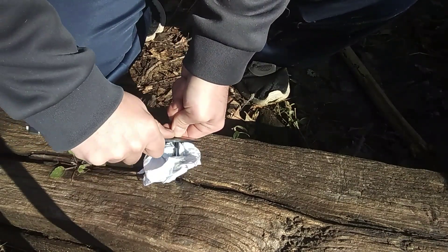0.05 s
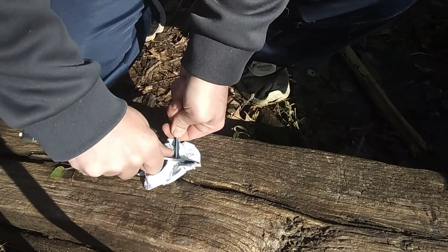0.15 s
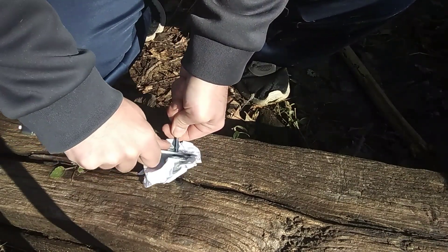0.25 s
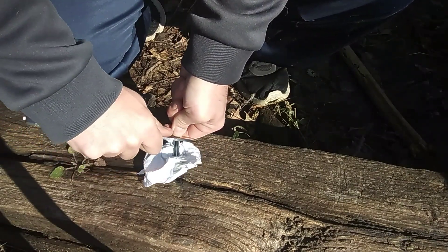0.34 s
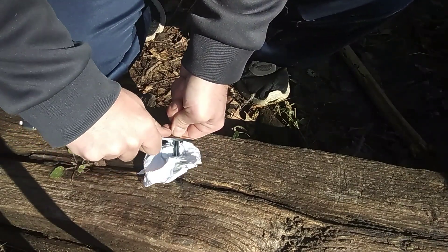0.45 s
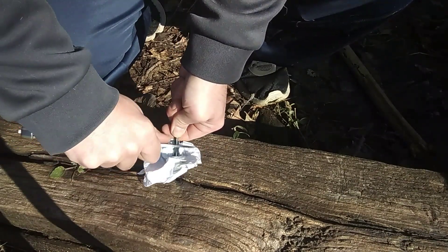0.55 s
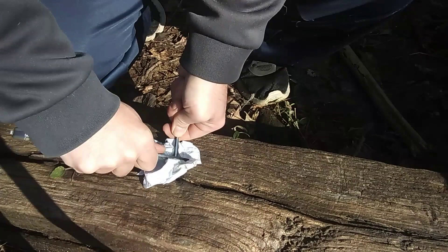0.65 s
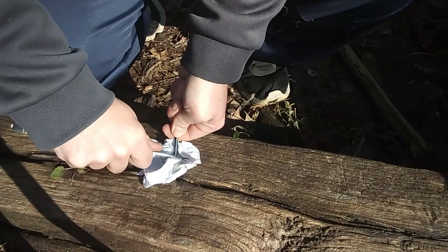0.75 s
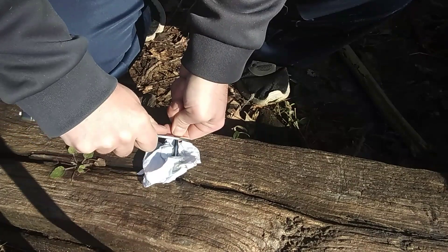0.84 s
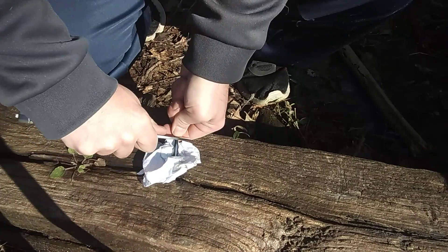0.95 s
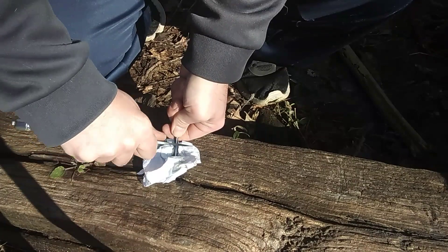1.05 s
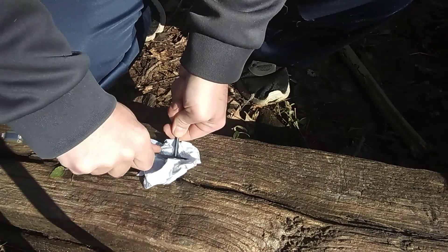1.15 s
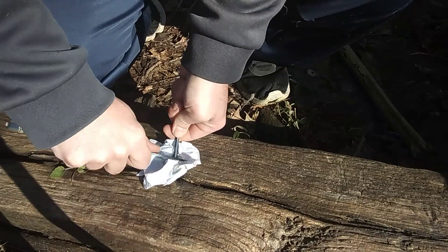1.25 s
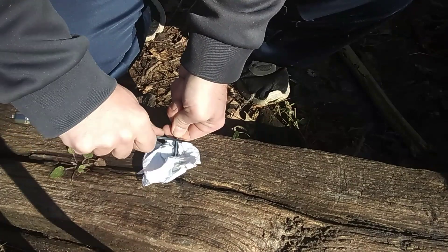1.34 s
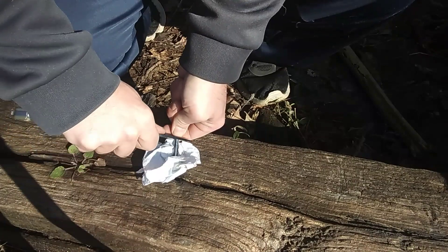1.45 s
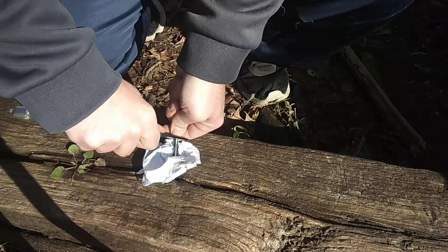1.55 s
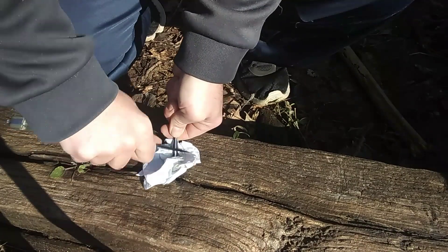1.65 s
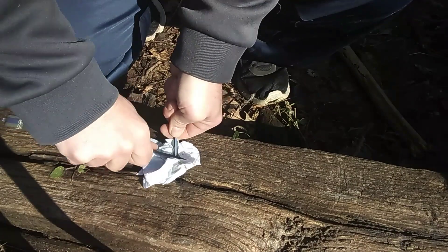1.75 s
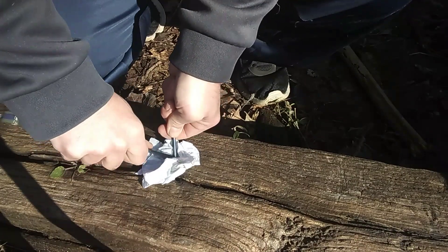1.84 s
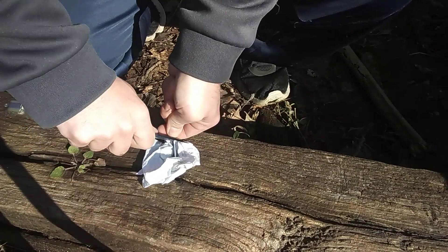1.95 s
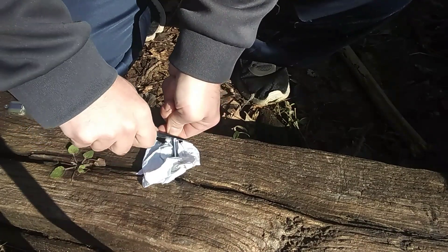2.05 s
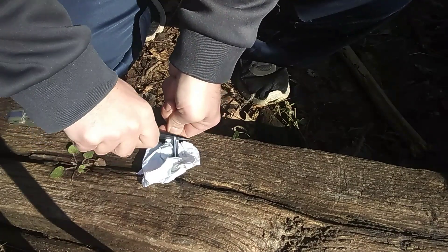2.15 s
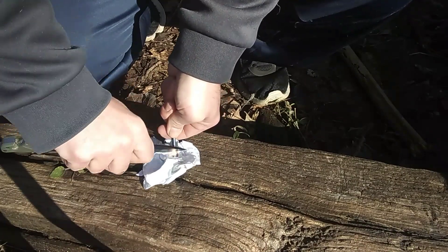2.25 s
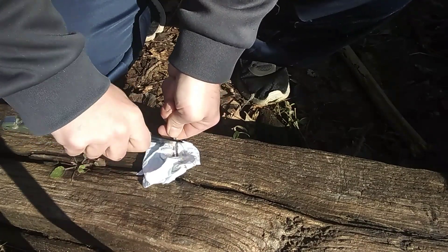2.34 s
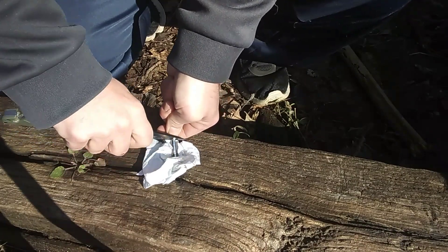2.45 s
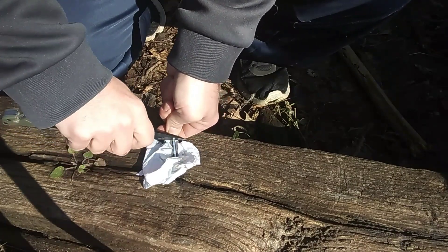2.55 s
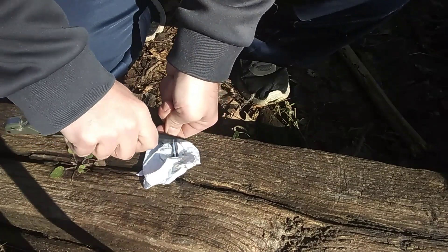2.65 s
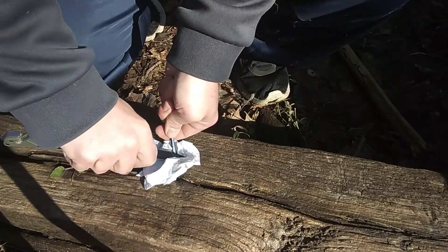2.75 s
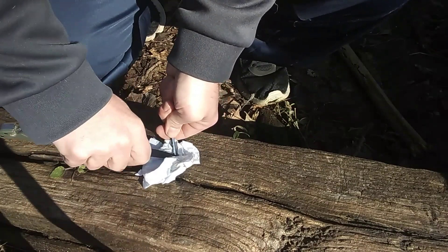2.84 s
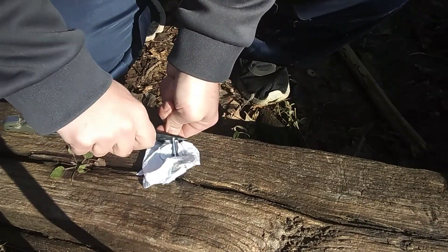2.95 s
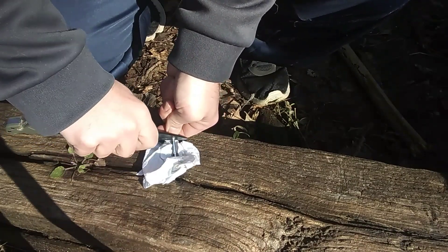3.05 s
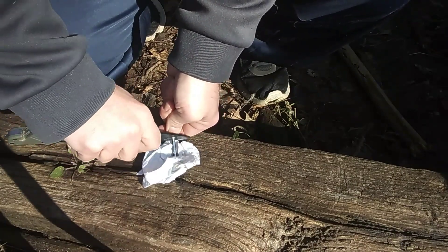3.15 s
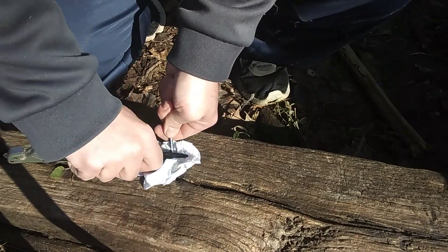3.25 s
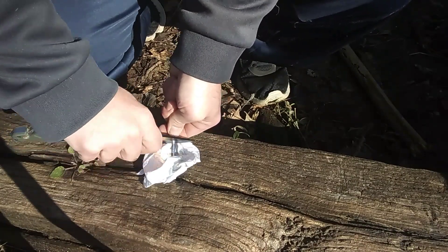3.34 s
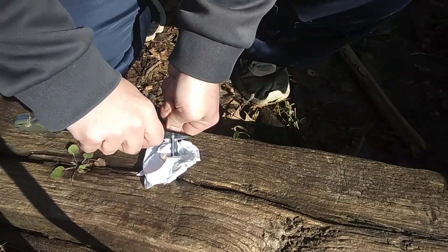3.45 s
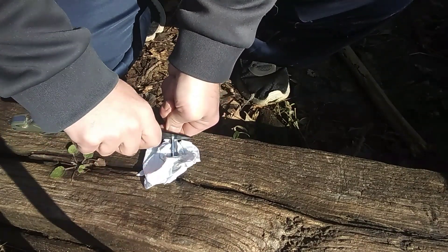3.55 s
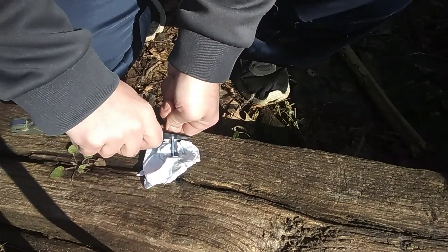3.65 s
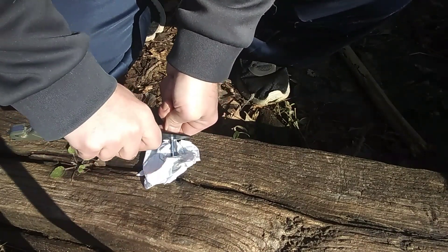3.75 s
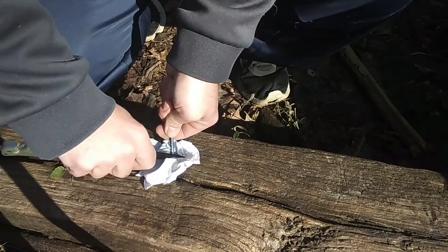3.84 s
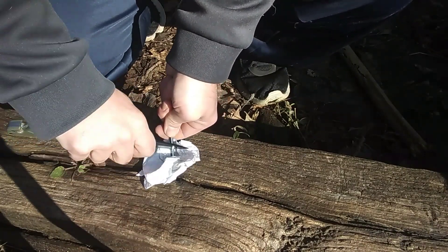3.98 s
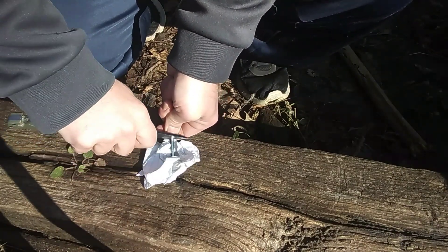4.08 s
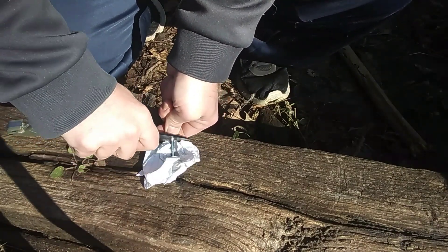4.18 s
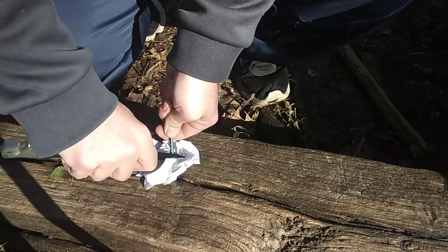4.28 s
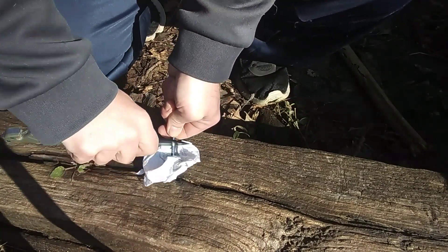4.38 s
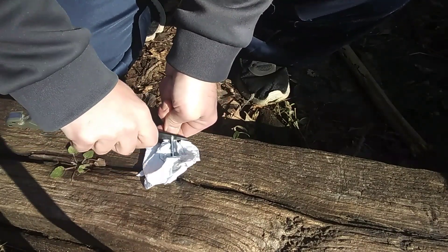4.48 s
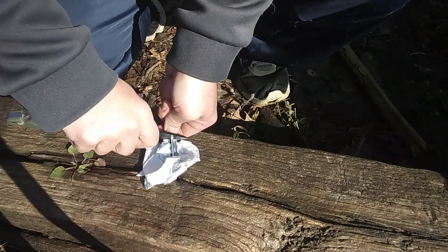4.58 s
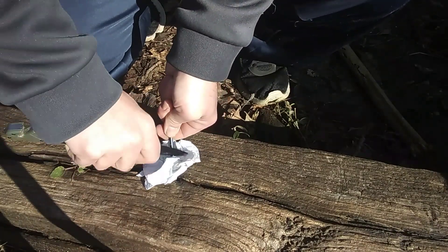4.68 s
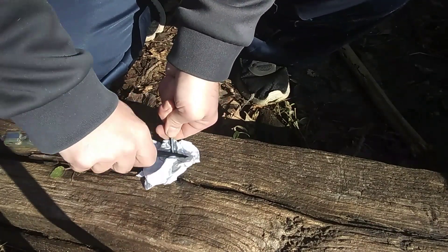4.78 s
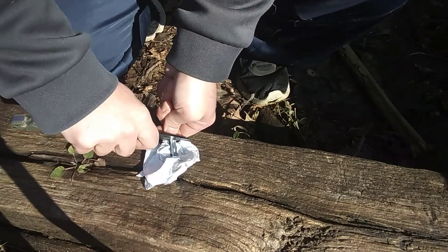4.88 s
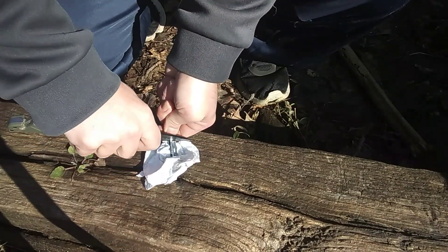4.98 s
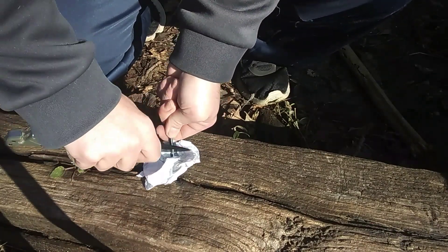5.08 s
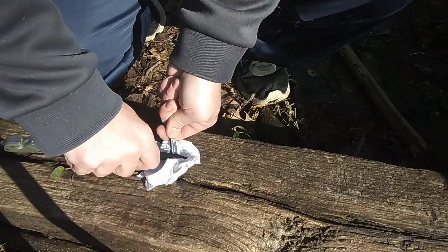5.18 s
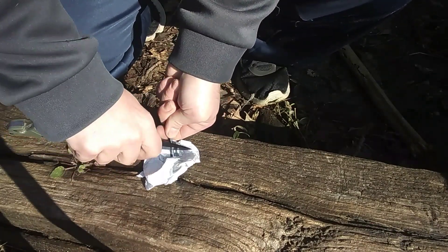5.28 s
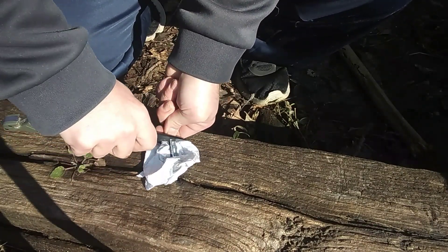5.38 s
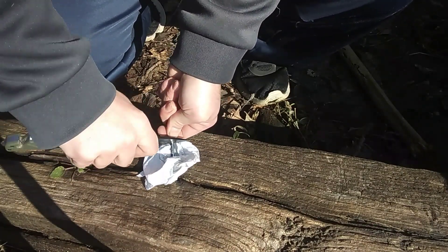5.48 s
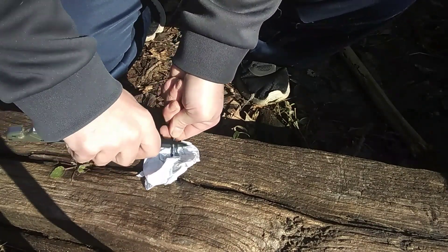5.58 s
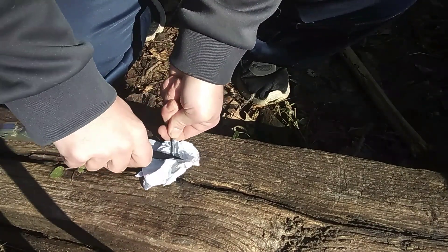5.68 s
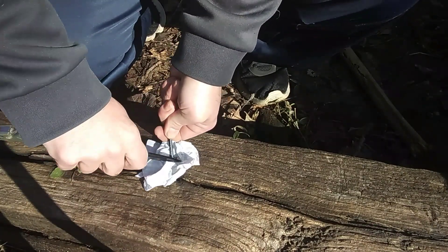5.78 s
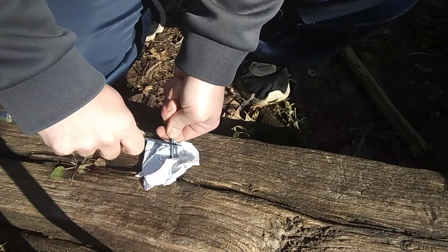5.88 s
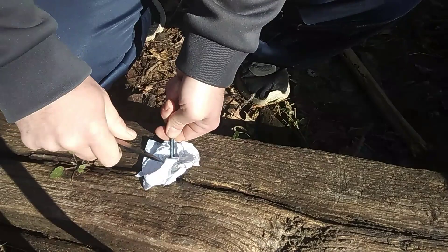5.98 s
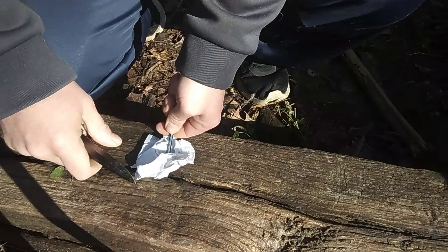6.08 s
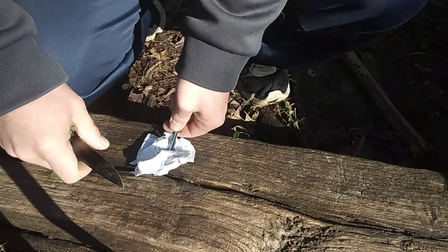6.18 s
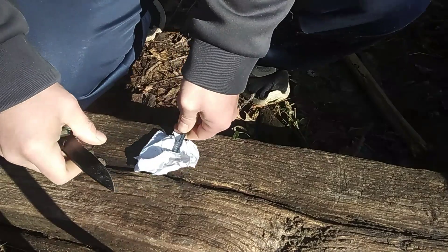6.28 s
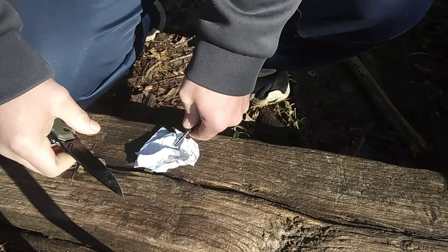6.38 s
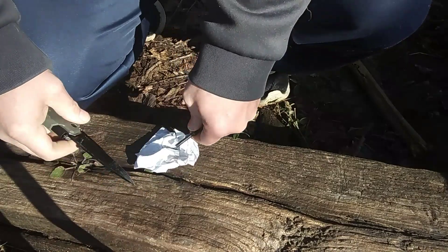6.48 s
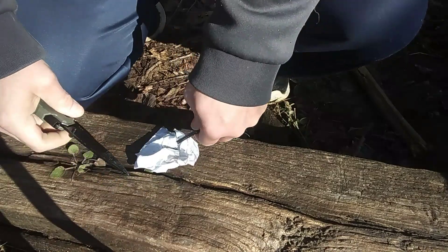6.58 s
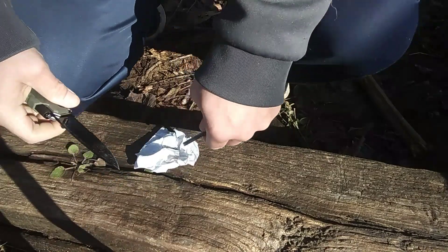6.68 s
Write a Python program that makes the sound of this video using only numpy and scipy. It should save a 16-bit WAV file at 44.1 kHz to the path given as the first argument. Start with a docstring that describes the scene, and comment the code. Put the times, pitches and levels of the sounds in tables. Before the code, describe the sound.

A knife blade scrapes down a small fire-starter rod in twelve quick rasping strokes ending in sharp snaps, with light metallic ticks between, outdoors.

```python
"""Outdoors, by a log: a knife is scraped twelve times down a fire-starter rod held against the wood.
Each stroke is a rising rasp of chip noise, shaped by edge force, that catches once and ends in a snap:
noise bursts ringing resonances of steel, hand and log. The blade then ticks and drags its way back up.
Sleeves rustle, the ground returns a short scattered tail, and filtered noise makes a soft distant rush."""
import sys
import numpy as np
from scipy import signal
from scipy.fft import rfft, irfft, next_fast_len
from scipy.io import wavfile
from scipy.ndimage import uniform_filter1d, map_coordinates

SR = 44100
rng = np.random.default_rng(int(sys.argv[2]) if len(sys.argv) > 2 else 0)


def wav_out(sig):
    """Save sig, one row per channel (or a flat mono array), as 16-bit PCM at SR to the path in sys.argv[1]."""
    wavfile.write(sys.argv[1], SR, np.round(np.clip(np.atleast_2d(sig).T, -1, 1) * 32767).astype(np.int16))


N = 296352

# All table levels are relative: each layer adds its own trim.
# Forward strokes, one in two bites: [edge slips off t/s, length/s, rasp level/dB, crack level/dB,
# rod-and-hand knock level/dB, log thud level/dB]
STROKE_ROWS = [(0.146, 0.018, -30, -21.5, -38.5, -40), (0.623, 0.017, -25, -15, -20, -34.5),
               (1.129, 0.015, -23, -12, -21, -34), (1.7145, 0.018, -28.5, -10.5, -26, -27.5),
               (2.271, 0.014, -32, -31, -34, -44), (2.748, 0.02, -31, -16, -22, -30),
               (3.278, 0.021, -26.5, -16.5, -24, -31.5), (3.844, 0.021, -27, -14, -18.5, -26.5),
               (4.324, 0.019, -29, -10.5, -19, -29), (4.7423, 0.027, -32.5, -10, -27, -27.5),
               (5.125, 0.022, -39, -23.5, -25, -46), (5.161, 0.016, -31, -24, -23.5, -28.5),
               (5.6511, 0.015, -28.5, -14, -29, -40)]
# Blade sliding lightly back up the rod: [middle t/s, length/s, level/dB]
DRAG_ROWS = [(0.226, 0.024, -38), (0.341, 0.042, -43), (0.713, 0.05, -52), (0.835, 0.04, -40),
             (1.201, 0.018, -41.5), (1.348, 0.072, -39.5), (1.791, 0.037, -45.5), (1.849, 0.033, -47),
             (1.959, 0.04, -43), (2.305, 0.022, -45), (2.37, 0.075, -42), (2.482, 0.05, -53),
             (2.837, 0.045, -49.5), (2.945, 0.053, -38.5), (3.368, 0.044, -37.5), (3.372, 0.14, -42),
             (3.944, 0.046, -41.5), (4.06, 0.04, -38.5), (4.42, 0.056, -39.5), (4.528, 0.016, -41.5),
             (4.847, 0.05, -39), (5.34, 0.065, -40.5), (5.449, 0.048, -52.5), (5.791, 0.13, -52.5)]
# Resonances: [f/Hz, width/Hz, level/dB]
STEEL_MODES = [(1910, 395, -0.5), (2720, 384, 1.5), (3130, 610, -0.5), (4090, 595, 3), (4950, 1090, 1),
               (7500, 1860, -5), (10900, 1100, -11.5), (12700, 3900, -21.5)]  # ring of blade and rod
KNOCK_MODES = [(763, 830, 0.5), (1075, 155, 9), (1336, 150, 0)]  # rod and hand
THUD_MODES = [(304, 67, 1), (554, 120, 3)]  # log under the rod
ZING_MODES = [(5740, 840, 11), (8330, 1200, -1.5), (10000, 1530, -1)]  # edge skimming the rod


def amp(db):
    """Decibels to gain."""
    return 10 ** (np.asarray(db) / 20)


def unit(x):
    """Scale to rms 1."""
    return x / np.sqrt(np.mean(x ** 2) + 1e-20)


def along(points, hz):
    """Read (f/Hz, value) points on a log frequency axis."""
    f, v = np.transpose(points)
    return np.interp(np.log(hz + 1), np.log(f + 1), v)


def wobble(rate_hz):
    """Smooth random curve, rate_hz knots a second."""
    knots = rng.standard_normal(int(N * rate_hz / SR) + 4)
    return map_coordinates(knots, [np.arange(N) * rate_hz / SR])


def filtered(x, response):
    """Multiply the spectrum of x by a function of frequency."""
    m = 2 * next_fast_len(N // 2 + SR // 4)
    return irfft(rfft(x, m) * response(np.fft.rfftfreq(m, 1 / SR)), m)[..., :N]


def coloured(x, spectrum):
    """Minimum-phase filter with the given spectrum; white noise keeps its power."""
    def response(hz):
        cepstrum = irfft(np.log(unit(amp(along(spectrum, hz)))))
        half = len(cepstrum) // 2
        cepstrum[1:half] *= 2  # fold onto positive time: causal
        cepstrum[half + 1:] = 0
        return np.exp(rfft(cepstrum))
    return filtered(x, response)


def resonate(x, modes):
    """Damped resonances, steep below the first one; white noise keeps its power."""
    def response(f):
        h = 0
        for k, (centre, width, db) in enumerate(modes):
            damping = 1j * f * width
            h = h + (-1) ** k * amp(db) * damping / (centre * centre - f * f + damping)
        low = modes[0][0] * 0.77
        h = h * f * f / (low * low - f * f + 1j * f * low)
        return h / np.sqrt(np.mean(abs(h) ** 2))
    return filtered(x, response)


def add(track, s, sound):
    """Mix a sound into the track at s seconds."""
    part = track[..., max(round(s * SR), 0):][..., :sound.shape[-1]]
    part += sound[..., :part.shape[-1]]


def grit(rate_hz, spread_db, smooth_db):
    """Tiny chips torn off at random moments and sizes, over smooth friction (mid, side)."""
    sizes = amp(spread_db * np.clip(rng.standard_normal(N), -2, 2))
    chips = (rng.random(N) < rate_hz / SR) * sizes
    chips = unit(chips * rng.choice([-1, 1], (2, N)))
    return unit(chips + amp(smooth_db) * rng.standard_normal((2, N)))


def burst(rise_s, t60_s, first):
    """One hard impact (weight first) 1 ms in, amid micro-impacts that swell and die (mid, side)."""
    t = np.arange(SR // 20) / SR
    x = rng.standard_normal((2, len(t))) * (1 - np.exp(-(t / rise_s) ** 2)) * amp(-60 * t / t60_s)
    x /= np.linalg.norm(x, axis=1, keepdims=True)
    x[:, round(.001 * SR)] += first * np.array([1, rng.choice([-1, 1])])
    x /= np.linalg.norm(x, axis=1, keepdims=True)
    return x * np.sqrt(SR / 1000)  # energy of 1 ms at rms 1


def swells(rows, steep):
    """Gain of rounded swells given as [middle t/s, length/s, level/dB]."""
    t = np.arange(N) / SR
    return sum(amp(db) / (1 + (2 * abs(t - s) / length) ** steep) for s, length, db in rows)


def strokes():
    """The edge first skims with a bright zing, then bites harder until it leaves the rod; the log rumbles along."""
    # [f/Hz, density/dB per Hz]
    rasp_spectrum = [(88, -40), (150, -30), (303, -20), (514, -11), (730, -29.5), (979, 10.5), (1390, -1.5),
                     (1940, 3.5), (2450, -0.5), (3220, 5), (3550, 1), (5680, 3.5), (9440, -6),
                     (10400, -5.5), (16000, -55)]
    build_db, light_db = 2.5, 6.5  # rise per stroke length; drop before the edge digs in
    skim_reach, let_go_s = 1.68, 0.0013  # reach in stroke lengths; release time constant
    skim_db, knock_rub_db, thud_rub_db = -7.5, -15, -19  # zing re rasp; knock and thud re their snap
    t = np.arange(N) / SR
    skim, bite, knock, thud = np.zeros((4, N))
    for end, length, db, _, knock_db, thud_db in STROKE_ROWS:
        to_go = abs(t - end) / length
        touching = np.exp(-np.maximum(t - end, 0) / let_go_s) / (1 + (to_go / skim_reach) ** 6)
        digs_in = 1 / (1 + to_go ** 12)
        force = touching * amp(-build_db * to_go - light_db * (1 - digs_in))
        skim += touching * amp(db + skim_db) / (1 + to_go ** 4)
        bite += force * amp(db)
        knock += force * amp(knock_db + knock_rub_db)
        thud += force * amp(thud_db + thud_rub_db)
    chatter = amp(2.5 * wobble(380))  # stick and slip
    rasp = coloured(grit(rate_hz=3000, spread_db=1.0, smooth_db=-2.5) * bite * chatter, rasp_spectrum)
    zing = resonate(grit(rate_hz=3000, spread_db=4, smooth_db=-3) * skim * chatter, ZING_MODES)
    drive = grit(rate_hz=2500, spread_db=3, smooth_db=-3) * chatter
    rumble = resonate(drive * knock, KNOCK_MODES) + resonate(drive * thud, THUD_MODES)
    return amp(-2.0) * rasp + zing + rumble


def snaps():
    """A last chip tears off: bursts ring the steel (crack), its slower low modes, rod and hand, and the log."""
    crack, flex, knock, thud = np.zeros((4, 2, N))
    for s, _, _, db, knock_db, thud_db in STROKE_ROWS:
        add(crack, s - .0005, amp(db - 5.0) * burst(rise_s=0.0021, t60_s=0.0097, first=1.0))
        add(flex, s + 0.000824, amp(db - 16.5) * burst(rise_s=0.00019, t60_s=0.063, first=1.0))
        add(knock, s + 0.00028, amp(knock_db - 2.5) * burst(rise_s=0.0045, t60_s=0.0031, first=0.9))
        add(thud, s + 0.00177, amp(thud_db - 1.5) * burst(rise_s=0.00069, t60_s=0.021, first=0.76))
    steel = resonate(crack, STEEL_MODES) + resonate(flex, STEEL_MODES[:3])
    return steel + resonate(knock, KNOCK_MODES) + resonate(thud, THUD_MODES)


def ticks():
    """Sharp ringing taps, a few ms of faint noise swelling in before each; the touch point sets the pitch."""
    # clearest taps of blade on rod: [t/s, level/dB, f/Hz]
    taps = [(0.1575, -24, 6050), (0.3281, -19.5, 1930), (0.3471, -17.5, 1720), (0.4136, -20.5, 4270),
            (0.6836, -11, 4070), (0.7447, -16.5, 2050), (0.811, -18.5, 4860), (0.9197, -19.5, 4260),
            (1.1902, -13, 3250), (1.2112, -14.5, 3860), (1.293, -13.5, 6240), (1.3401, -12, 2100),
            (1.3453, -7.5, 2300), (1.389, -19, 4530), (1.7451, -6.5, 6100), (1.9, -25, 3340),
            (1.9776, -21.5, 2930), (2.0489, -34, 3700), (2.981, -15.5, 5060), (3.2909, -9.5, 6100),
            (3.468, -20, 4630), (3.5413, -25, 3630), (3.9036, -22, 3080), (3.9472, -18.5, 4830),
            (4.0715, -15.5, 4700), (4.3966, -21, 1100), (4.4095, -18.5, 5270), (4.5236, -20.5, 4300),
            (4.8331, -20.5, 1950), (4.8638, -23, 5240), (5.3261, -23.5, 4560), (5.371, -18, 5160),
            (5.6278, -26, 5000), (5.9307, -30.5, 6900), (6.0705, -29.5, 6440)]
    ring_db, ring_octaves, tap_knock_db = 8, 0.36, -24  # lift and width of brightest band; knock re tap
    steel, knock = np.zeros((2, 2, N))
    for s, db, centre_hz in list(taps) + catches(count=3):
        z = rfft(burst(rise_s=0.00065, t60_s=0.021, first=1.0))
        octaves = np.log2((np.linspace(0, SR / 2, z.shape[1]) + 1) / centre_hz)
        emphasis_db = ring_db * np.exp(-(octaves / ring_octaves) ** 2)
        tap = np.roll(irfft(z * amp(emphasis_db)), SR // 1000)
        add(steel, s - .001, amp(db - 13.0) * tap)
        lead_in = burst(rise_s=0.0007, t60_s=0.035, first=0)[:, ::-1]  # reversed: noise swells up to the tick
        add(steel, s + .001 - lead_in.shape[1] / SR, amp(db - 28) * lead_in)
        add(knock, s, amp(db + tap_knock_db) * burst(rise_s=0.00058, t60_s=0.0055, first=1.0))
    return resonate(steel, STEEL_MODES) + resonate(knock, KNOCK_MODES)


def catches(count):
    """Rows [t/s, level/dB, f/Hz]: a catch late in every stroke, count snags per drag, strongest mid-drag."""
    lead_s, catch_db, catch_hz = 0.01, 12, 4200  # time before slip-off; level re rasp
    snag_db, spread_db, snag_hz, spread_octaves = 15.5, 3.5, 4030, 0.8  # level re drag
    rows = [(end - lead_s, db + catch_db, catch_hz) for end, _, db, *_ in STROKE_ROWS]
    for s, length, db in DRAG_ROWS:
        for when, size, pitch in rng.uniform(-1, 1, (count, 3)):
            level_db = db + snag_db + spread_db * (size - when ** 2)
            rows.append((s + when * length / 2, level_db, snag_hz * 2 ** (spread_octaves * pitch)))
    return rows


def drags():
    """Under light pressure the edge grates over the scored rod: chip noise plus a fluctuating zing."""
    # [f/Hz, density/dB per Hz]
    slide_spectrum = [(120, -49.5), (200, -11), (968, 9.5), (1320, 5.5), (1480, 8), (2020, 4.5), (2470, 3),
                      (4680, 6), (7970, -2), (9230, -5.5), (10900, -21), (13100, -28), (16000, -47)]
    force = swells(DRAG_ROWS, steep=4.3) * amp(3 * wobble(200))
    slide = coloured(grit(rate_hz=2000, spread_db=10.5, smooth_db=0) * force, slide_spectrum)
    scratches = grit(rate_hz=1200, spread_db=5, smooth_db=-4) * amp(3.5 * wobble(90))
    zing = resonate(scratches * force, ZING_MODES)
    return amp(-3.0) * slide + amp(-10) * zing


def shifting(x, depth_db):
    """The contact point moves along blade and rod, so the favoured frequencies keep changing within ms."""
    z = signal.stft(x, nperseg=256)[2]
    field = uniform_filter1d(rng.standard_normal(z.shape[1:]), size=5, axis=0)  # over frequency
    field = unit(uniform_filter1d(field, size=6, axis=1))  # over time
    gain = unit(amp(depth_db * np.clip(field, -2, 2)))
    return signal.istft(z * gain, nperseg=256)[1][:, :N]


def sleeves():
    """Cloth that never quite rests: creases rustle faintly, most when the hands draw back at the end."""
    # sleeves brush as the hands move: [middle t/s, length/s, level/dB]
    brushes = [(4.63, 0.3, -73), (5.8, 0.16, -52.5), (6.11, 0.09, -52.5), (6.4, 0.072, -57)]
    motion = amp(-67) + swells(brushes, steep=2.3)
    creases = grit(rate_hz=220, spread_db=4.5, smooth_db=-1) * motion * amp(-5 + 3 * wobble(40))
    # f/Hz, density/dB per Hz
    cloth = [(400, -22), (1500, -7), (4000, 3.5), (6000, -1), (9000, -12.5), (16000, -21)]
    return coloured(creases, cloth)


def ground(x):
    """Log, clothes and leaf litter scatter a short tail; a weaker one returns from further off."""
    t = np.arange(SR // 4) / SR
    tail = rng.standard_normal((2, len(t))) * (1 - np.exp(-(t / 0.011) ** 2))
    near = amp(-60 * t / 0.051)
    far = amp(-25 - 60 * t / .45)
    tail *= near + far
    return signal.fftconvolve(x, tail / np.linalg.norm(tail[0]), axes=1)[:, :N]


def distance():
    """Steady, faintly wavering outdoor rush: coloured noise under a slow random gain."""
    # [f/Hz, density/dB per Hz]
    air_spectrum = [(15, -33), (25, -44), (92, -31), (223, -9.5), (301, -10.5), (560, -3.5), (1040, 1),
                    (1130, -0.5), (2760, -11), (3620, -18), (5280, -18), (7110, -26), (12900, -31.5),
                    (14400, -29.5), (16000, -34)]
    waver_db = .35 * wobble(6) - 0.56 * wobble(1)
    return amp(-54 + waver_db) * unit(coloured(rng.standard_normal((2, N)), air_spectrum))


def scene():
    """Mix as mid and side; the side filter leaves all but the treble nearly central."""
    # [f/Hz, side gain/dB]
    side_gain = [(2000, -68), (4500, -61), (7000, -46), (10000, -22), (15000, -15)]
    rubbing = shifting(strokes() + drags() + sleeves(), depth_db=3.6)
    hands = rubbing + snaps() + ticks()
    mid, side = hands + amp(-20.0) * ground(hands) + distance() * amp([[0], [-12]])
    side = filtered(side, lambda hz: amp(along(side_gain, hz)))
    return np.array([mid + side, mid - side])


def record(dry):
    """Band limit: nothing is kept from 16 kHz up."""
    return filtered(dry, lambda hz: hz < 16000)


dry = scene()
out = record(dry)
wav_out(out)
```